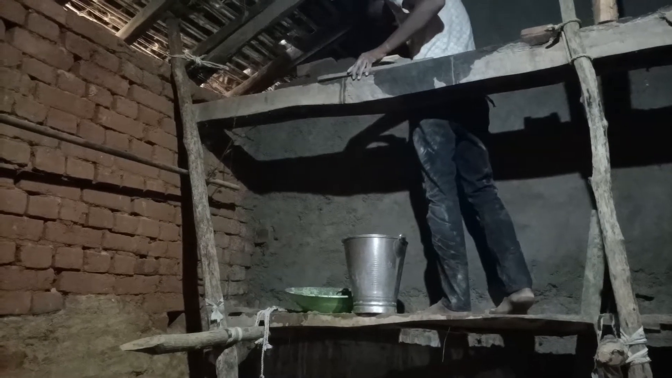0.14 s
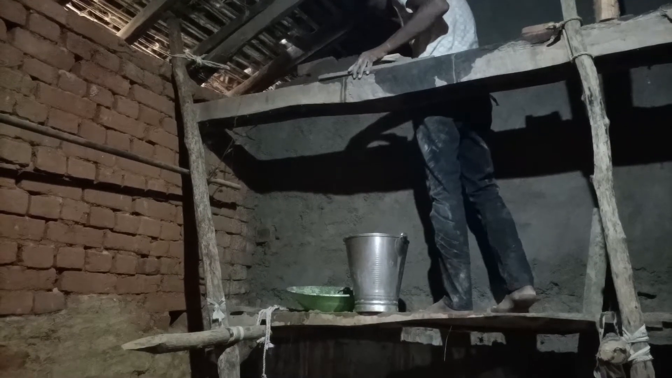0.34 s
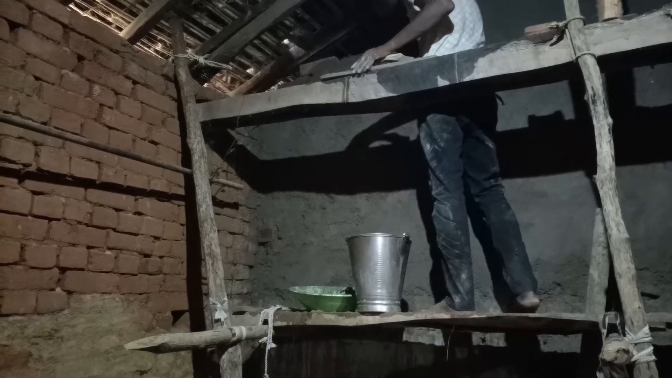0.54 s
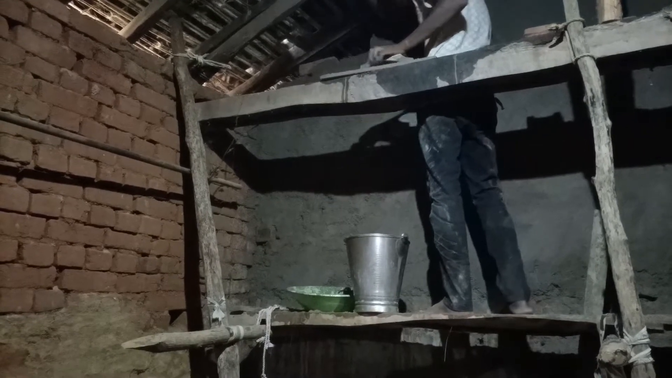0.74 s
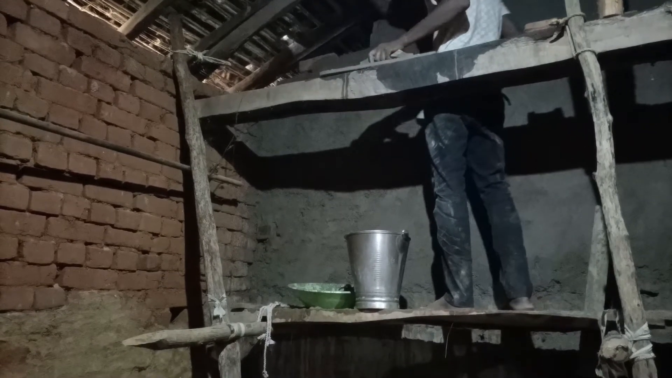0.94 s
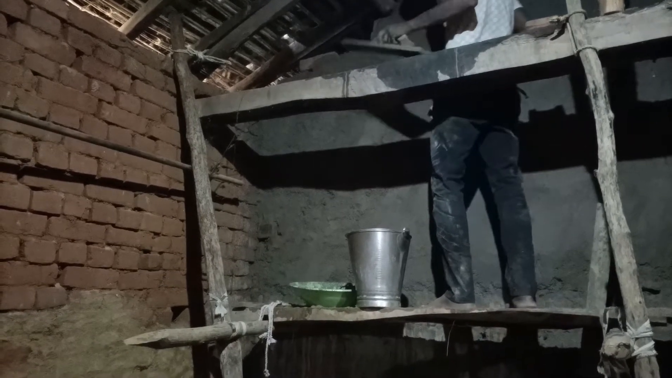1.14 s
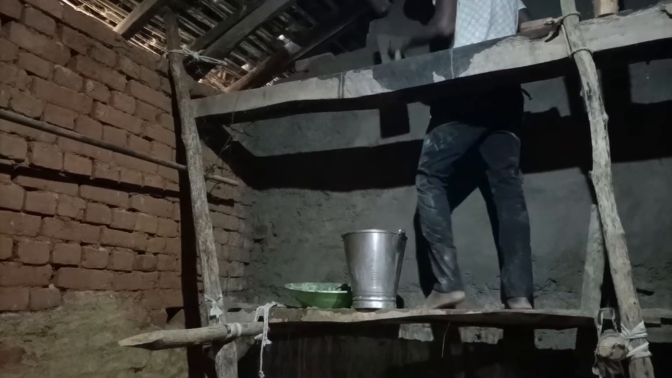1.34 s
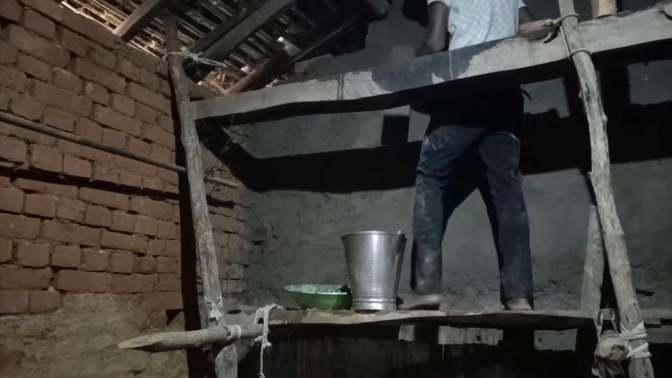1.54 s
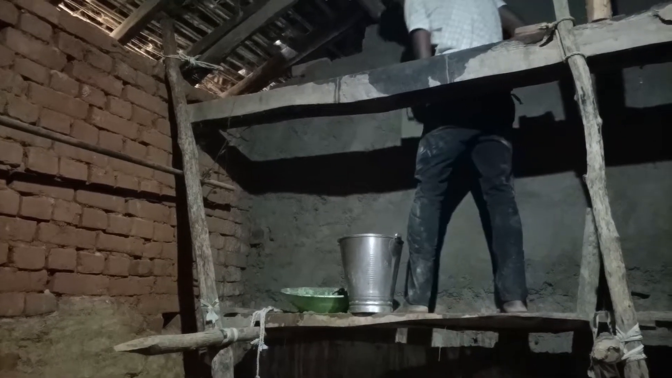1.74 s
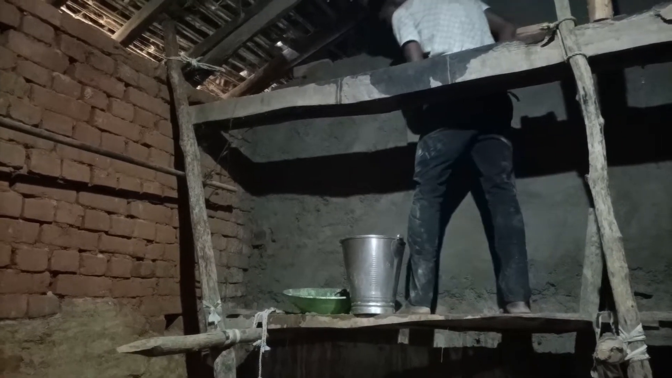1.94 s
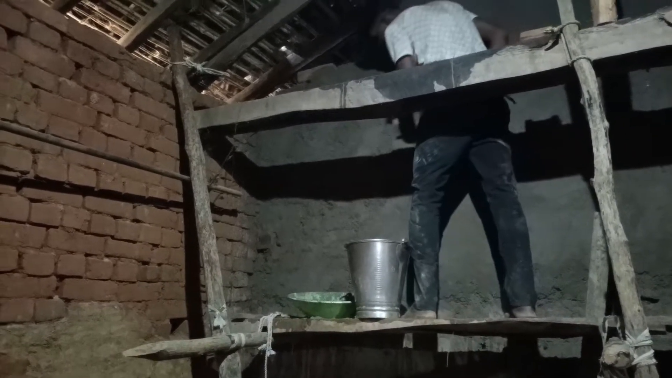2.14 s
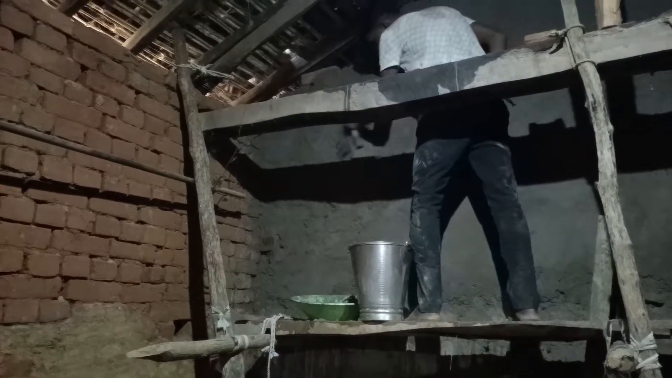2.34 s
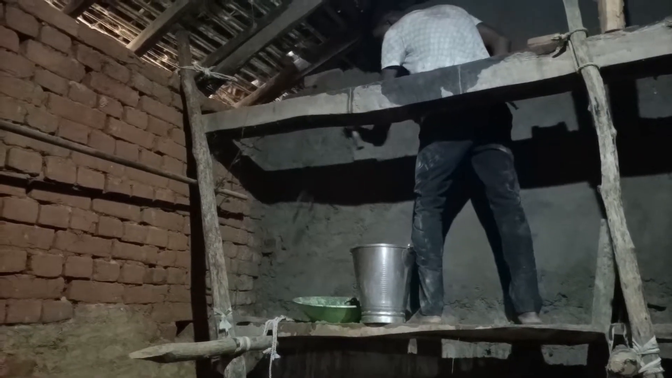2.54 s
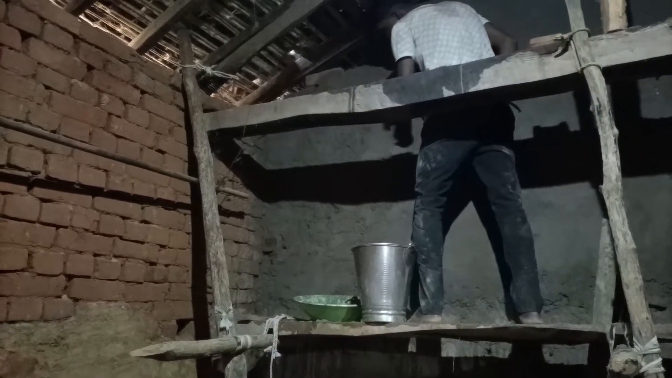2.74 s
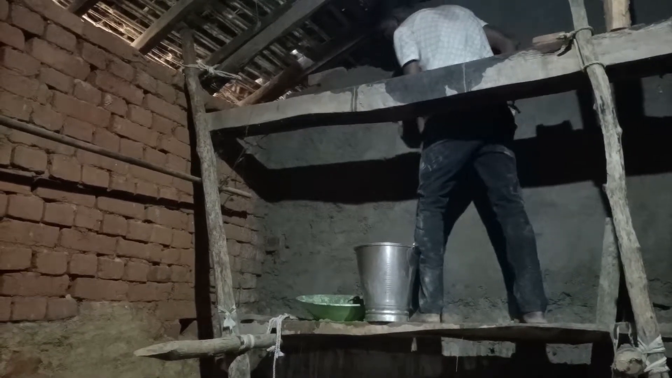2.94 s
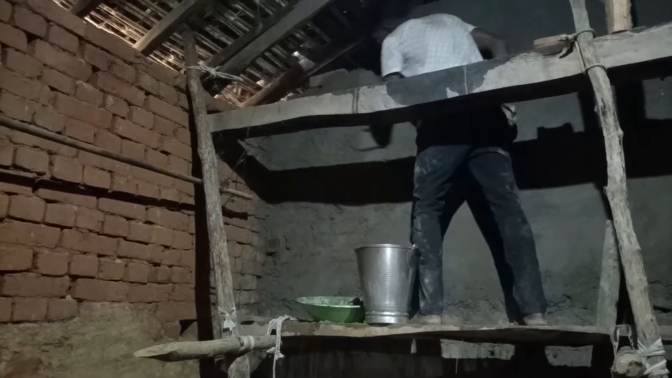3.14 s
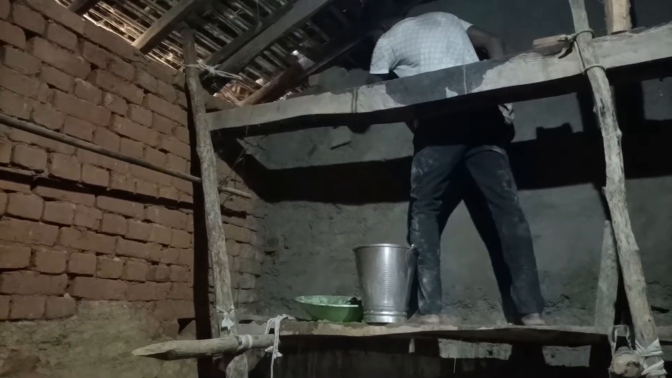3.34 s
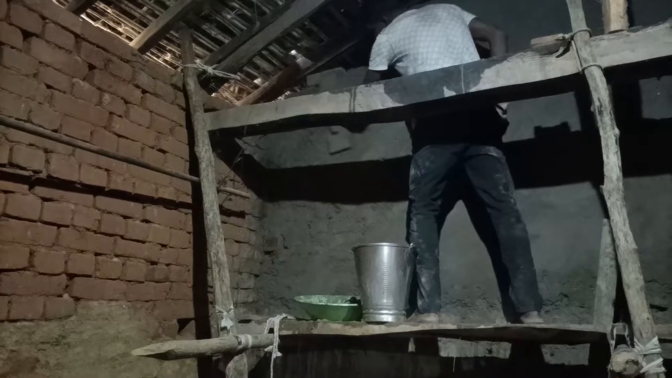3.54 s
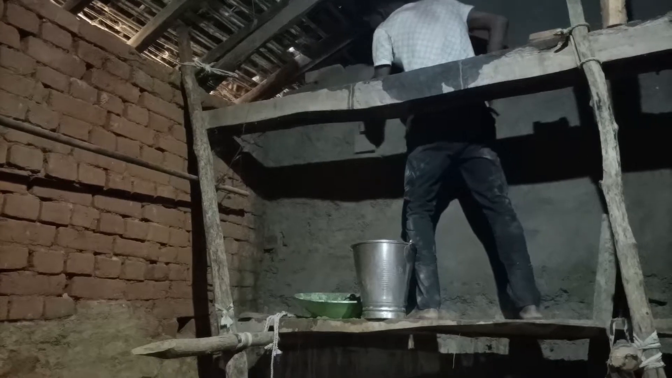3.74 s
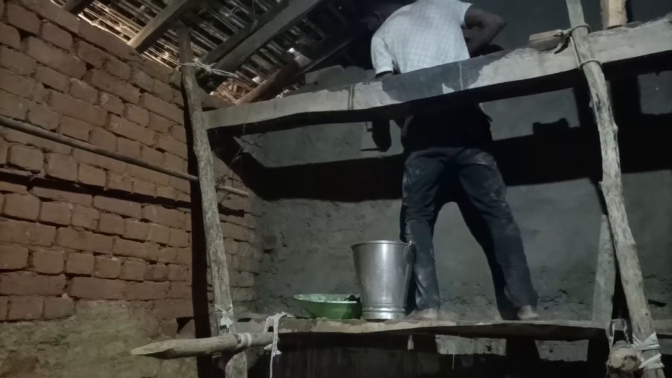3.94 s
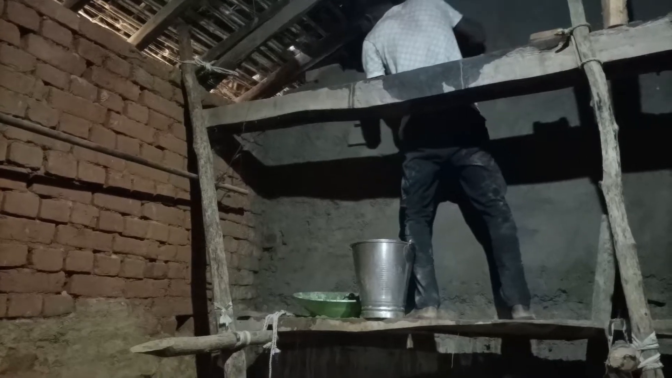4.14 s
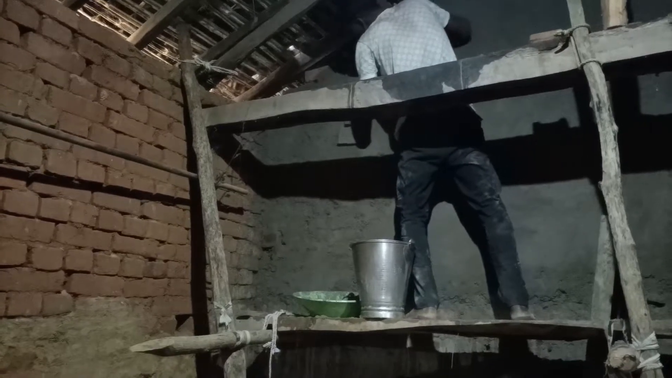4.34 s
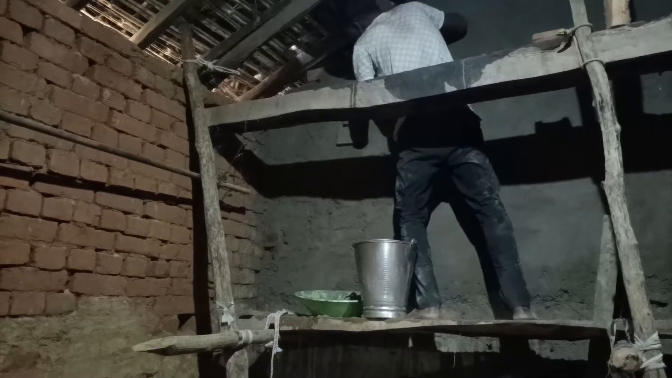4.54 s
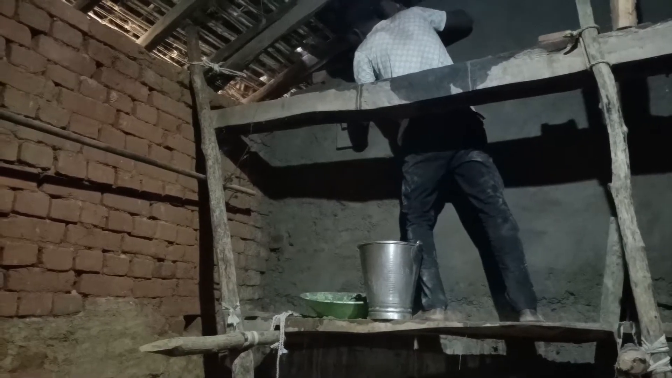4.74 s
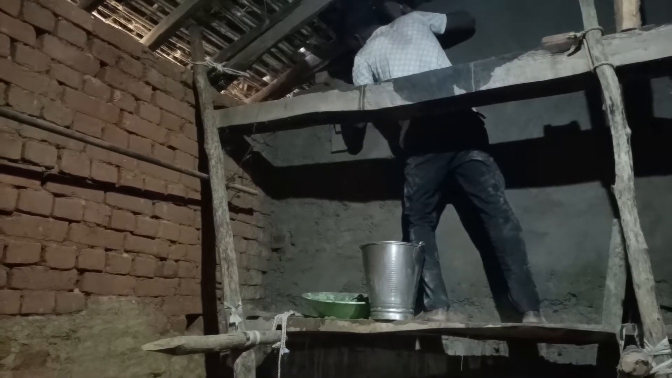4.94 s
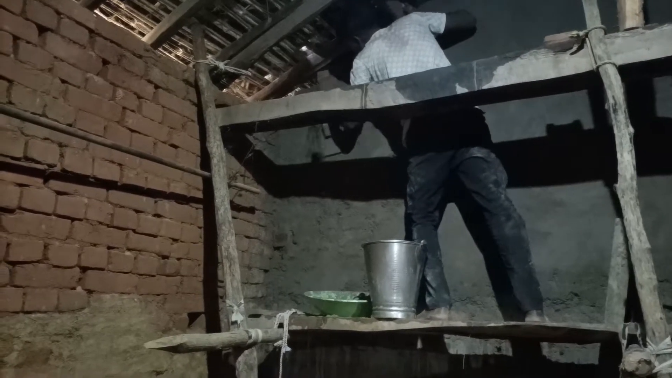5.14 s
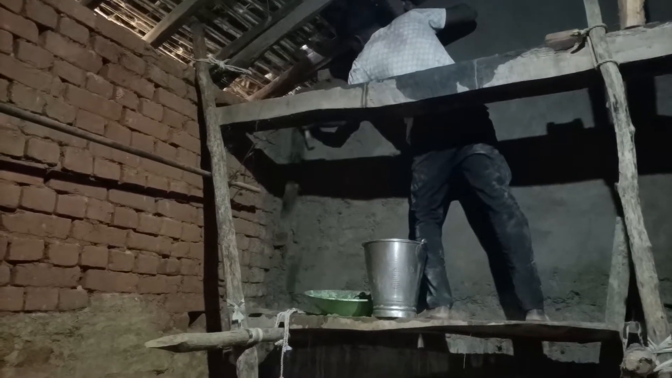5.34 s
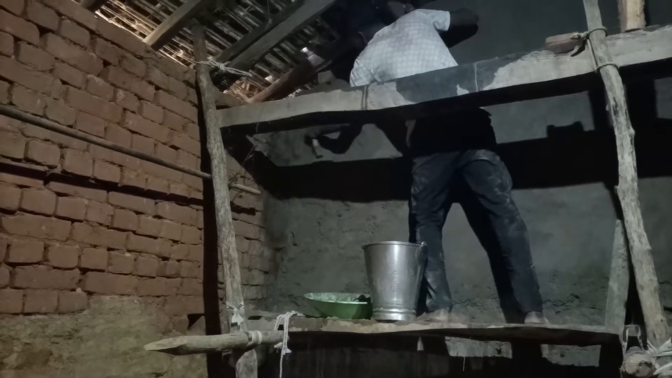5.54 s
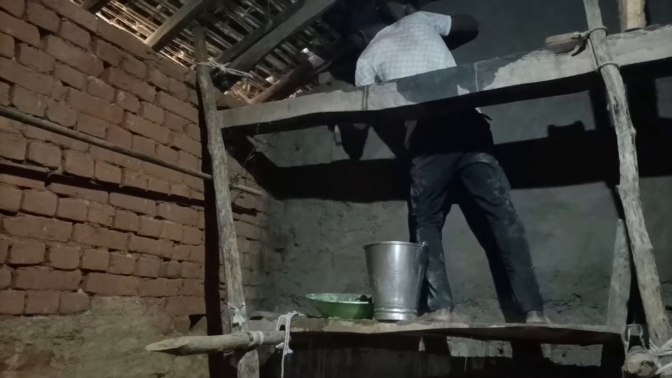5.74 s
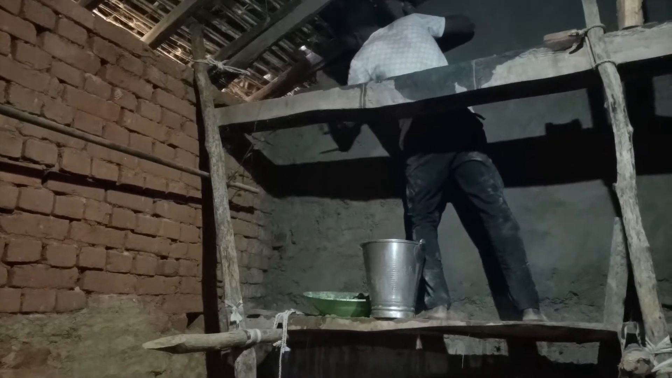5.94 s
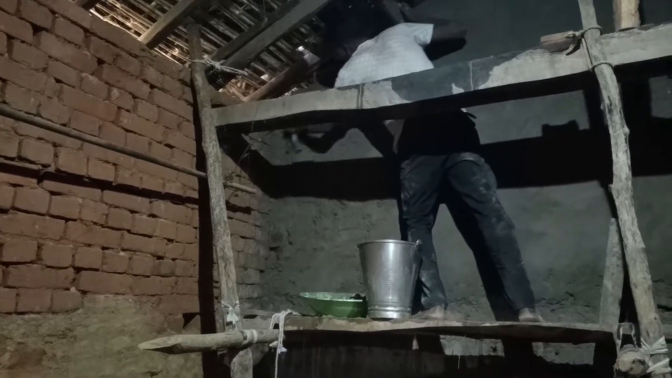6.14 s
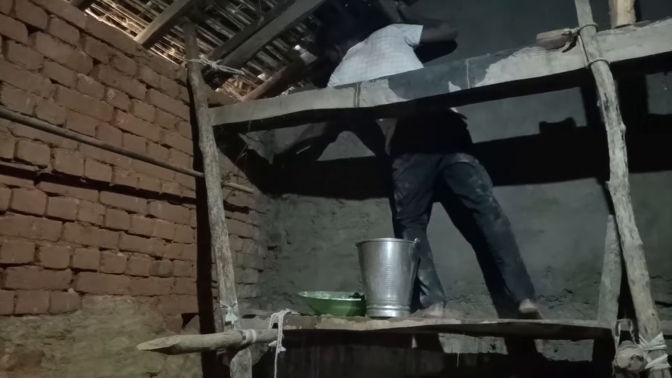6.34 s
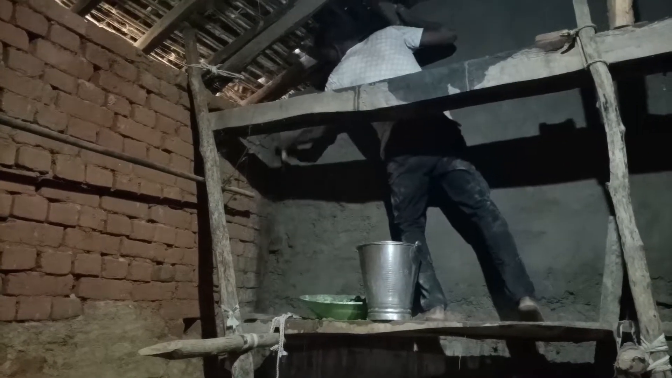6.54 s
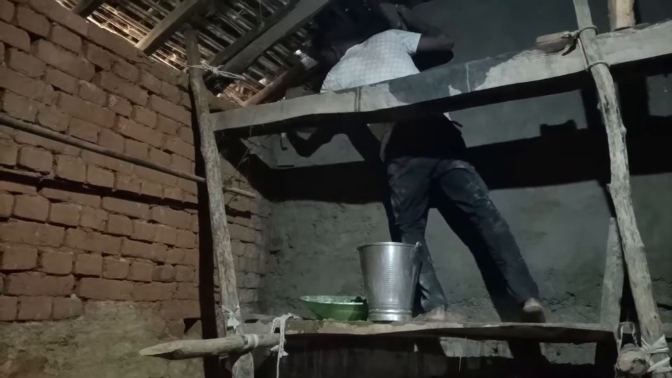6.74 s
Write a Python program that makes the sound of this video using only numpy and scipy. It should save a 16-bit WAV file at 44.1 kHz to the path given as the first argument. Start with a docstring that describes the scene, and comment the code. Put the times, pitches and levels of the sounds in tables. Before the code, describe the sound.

A steel trowel lightly scrapes up gritty mortar with a faint metallic ring, then spreads wet, hissing strokes across a wall, with dull thuds and judders.

```python
"""Plastering a wall by trowel

A plasterer on a plank scaffold in a small brick room scrapes mortar up with a steel trowel, then spreads it on the wall.
Sand is random grain impulses through coloured filters, and wet paste hisses as the same force in a treble band.
Hard pushes make the trowel stick and slip, drumming on modes of the wall; blows and grit ring modes of the blade.
Bumps and plank shudders punctuate the work; a bird chirp and two soft notes come faintly from outside."""
import sys
import numpy as np
from scipy import signal
from scipy.fft import rfft, irfft
from scipy.io import wavfile

SR = 44100
rng = np.random.default_rng(int(sys.argv[2]) if len(sys.argv) > 2 else 0)


def put_to_file(sound):
    """Save the sound as 16-bit audio at rate SR, in the file named by the first command-line argument."""
    columns = np.atleast_2d(sound).T  # one column per channel
    safe = np.clip(columns, -1, 1)
    whole_steps = np.round(safe * 32767)
    wavfile.write(sys.argv[1], SR, whole_steps.astype(np.int16))


N = 299439
TIME, HZ = np.arange(N) / SR, np.fft.rfftfreq(N, 1 / SR)

# Scrapes that gather mortar on the blade. Each row: hardest push, rise and fall in seconds, flexing resonance at the
# start and at the end in Hz, flexing over grinding in dB, then relative levels of grinding and wet hiss in dB.
GATHERING_SCRAPES = [(.11, 0.37, 0.12, 1200, 1490, -8, -39.5, -38.5),
                     (.5, 0.096, 0.032, 1660, 1740, -8, -42.5, -39.5),
                     (.818, 0.035, 0.059, 1700, 1700, -27, -60.5, -55),
                     (1.056, 0.027, 0.031, 1550, 1500, -0.5, -62.5, -62),
                     (1.31, 0.094, .06, 1500, 1450, -22, -67.5, -69),
                     (1.481, 0.043, 0.018, 1350, 1400, -12, -53, -51),
                     (1.664, 0.014, .035, 1620, 1560, 0, -56, -58),
                     (1.76, 0.095, 0.1, 1470, 1350, -6, -69.5, -68)]
# Strokes on the wall. Each row: the same columns, then relative levels of judder and of mortar drag in dB.
WALL_STROKES = [(1.96, 0.12, 0.12, 1460, 1700.0, -1.5, -50.5, -61, -65, -74),
                (2.38, 0.32, 0.18, 1650, 1170, -9.0, -30.5, -39.0, -59, -42.5),
                (2.709, 0.16, 0.2, 1220, 1330.0, -14.5, -33.5, -43.5, -67, -53),
                (2.93, 0.12, 0.16, 1560.0, 1540, -23, -44, -45.5, -63.5, -56),
                (3.2, 0.24, 0.27, 1440, 1580, -12.5, -28, -35.0, -44.5, -37),
                (3.39, 0.14, 0.19, 1900.0, 2200.0, -18, -32.5, -38, -52.5, -43),
                (3.769, 0.22, 0.24, 2340, 2800, -16, -34.5, -39.5, -66, -48.5),
                (4.229, 0.2, 0.28, 2400.0, 2370, -17.0, -30, -34, -38.5, -35.0),
                (4.52, 0.14, 0.55, 2400.0, 2250.0, -16.0, -42, -47.0, -59.5, -53),
                (5.2, 0.48, 0.087, 1170, 1420, -13.5, -38.5, -45.0, -55, -49.5),
                (5.349, 0.19, 0.31, 1340, 1400, -14.5, -35.0, -42.0, -52.5, -44),
                (5.74, 0.16, 0.083, 944, 1650, -9, -33, -37.5, -53, -49),
                (5.99, 0.31, 0.24, 2200.0, 2400.0, -25.0, -35, -36, -46.5, -45),
                (6.251, 0.25, 0.23, 900.0, 1150.0, -17.5, -27.5, -30.5, -31.0, -34.5),
                (6.49, 0.26, 0.23, 2450.0, 2550.0, -20.0, -38, -48.5, -50, -43.5),
                (6.73, 0.16, 0.16, 2430, 2950.0, -7.5, -35.5, -40.5, -53, -50.5)]
# The blade lands or flicks off. Each row: start in seconds, relative levels of crunch and paste splash in dB,
# T60 in seconds.
BLADE_TOUCHES = [(.303, -50, -37, 0.017), (.402, -47, -42, 0.18), (.622, -64, -55, 0.04),
                 (1.653, -47, -56.5, 0.072), (1.854, -44, -54, 0.13), (1.931, -39.5, -52, 0.15),
                 (2.945, -49, -32.5, .2), (3.011, -31, -29.5, .08), (3.058, -29.5, -28, 0.13),
                 (3.785, -39, -30.5, 0.16), (4.068, -35, -52, 0.064), (4.542, -29.5, -55, 0.076),
                 (4.574, -35.5, -48, 0.11), (4.626, -39, -58, .1), (4.928, -58, -39, .1),
                 (5.52, -48, -33.5, 0.16), (5.698, -31.5, -24, 0.12), (5.803, -33, -24, .14),
                 (5.9, -34, -24, 0.13), (6.082, -32, -26, 0.28), (6.533, -33, -46, .06),
                 (6.555, -28.5, -27.5, 0.094)]
# Modes of the free steel blade. Each row: frequency in Hz, relative level in dB, T60 in seconds.
BLADE_MODES = [(469, -13.5, 0.55), (683, -11, 0.81), (837, -10, 0.5), (1037, -25, 0.65), (1570, -9, 0.27),
               (1654, -4.5, 0.55), (2590, -1.5, 0.54), (3300, -8, 0.27), (3850, -18, .2), (4550, -8, 0.2),
               (5180, -5, 0.25)]
# Low modes of the wall that the trowel drums on. Each row: frequency in Hz, relative level in dB, T60 in seconds.
WALL_MODES = [(184, -6, 0.19), (236, 1.5, 0.087), (298.4, 3.5, 0.089), (343, -12, 0.078), (489.4, -11, 0.2)]
# Modes of the trowel body in thick mortar. Each row: frequency in Hz, relative level in dB, T60 in seconds.
DRAGGED_MODES = [(386, -3.5, 0.057), (452.4, 0, 0.088), (505, 1, 0.061), (656.5, -7.5, 0.28),
                 (773, 3.5, 0.054), (950, -5, 0.093)]
# Spectrum of sand ground under the blade. Each row: frequency in Hz, relative density in dB per Hz.
SAND_SPECTRUM = [(300, -42.5), (900, -8.5), (1180, -1.5), (1400, -2.5), (1650, -2), (2000, -0.5), (2600, 2),
                 (2950, 0.5), (3400, 0), (4000, -1), (5200, -3.5), (6200, -3), (7400, -17.5), (10000, -36)]
# Spectrum of hissing wet paste. Each row: frequency in Hz, relative density in dB per Hz.
PASTE_SPECTRUM = [(3000, -42), (6000, -3), (7800, -4), (9000, -0.5), (10200, 2), (12500, 0), (14000, 3),
                  (15500, 1)]
# Spectrum of thick, packed mortar. Each row: frequency in Hz, relative density in dB per Hz.
MORTAR_SPECTRUM = [(150, -16), (380, -7.5), (495, -4), (575, -1), (665, 2.5), (780, -1.5), (950, 0.5),
                   (1300, -10), (2500, -38)]


def amp(db):
    """Level to amplitude: 20 dB is a factor of ten."""
    return 10 ** (np.asarray(db) / 20)


def unit(x):
    """Normalization of a signal to rms 1."""
    return x / np.sqrt(np.mean(x ** 2) + 1e-20)


def read(points, hz):
    """Linear interpolation of a tabulated curve on a log-frequency axis."""
    f, value = np.transpose(points)
    return np.interp(np.log(hz + 1), np.log(f + 1), value)


def push(t, s, rise_s, fall_s):
    """Force envelope of one stroke: the arm's push is a rounded arch from 0 to 1 that tops at s."""
    ease_db = -18.5  # level at the ends of rise and fall
    arch = 2.49  # a higher power flattens the top
    away = np.maximum((s - t) / rise_s, (t - s) / fall_s)
    return amp(ease_db * np.minimum(away, 2) ** arch)


def gains(rows):
    """Power-law response to force: each layer grows as a power of the push, and overlapping strokes add in power."""
    # Exponents of the push, without unit, in order for grinding, wet hiss, judder and drag.
    push_powers = [1.064, 1.15, 1.84, 1.52]
    t, rows = TIME[::64], np.array(rows)
    pushes = np.array([push(t, *row[:3]) for row in rows])
    curves = []
    for levels_db, power in zip(rows.T[6:], push_powers):
        stroke_gains = amp(levels_db)[:, None] * pushes ** power
        curves.append(np.interp(TIME, t, np.linalg.norm(stroke_gains, axis=0)))
    return curves


def bursts(times, levels_db, t60s):
    """Exponential decay: contacts start suddenly and die away, each kept for at most half a second."""
    out = np.zeros(N)
    for s, db, t60 in zip(times, levels_db, t60s):
        part = out[round(s * SR):][:SR // 2]
        part += amp(db - 60 * TIME[:len(part)] / t60)
    return out


def colour(x, spectrum, size=4096):
    """Minimum-phase filtering: a causal filter of unit power shapes the spectrum."""
    hz = abs(np.fft.fftfreq(size, 1 / SR))
    low_skirt = 1 + (spectrum[0][0] / (hz + 1) / 2) ** 4
    high_skirt = 1 + (hz / spectrum[-1][0] / 2) ** 4
    magnitude = amp(read(spectrum, hz)) / np.sqrt(low_skirt * high_skirt)
    # the Hilbert transform of the log magnitude gives the minimum phase
    response = np.exp(np.conj(signal.hilbert(np.log(magnitude))))
    taps = np.fft.ifft(response).real
    return signal.oaconvolve(x, taps / np.linalg.norm(taps))[:N]


def ringing(modes):
    """Modal superposition: decaying cosines form an impulse response of energy 1."""
    t = TIME[:SR]
    ring = sum(amp(db - 60 * t / t60) * np.cos(2 * np.pi * hz * t) for hz, db, t60 in modes)
    return ring / np.linalg.norm(ring)


def through(x, modes):
    """Forced vibration: a force drives the modes of a body, which radiates little outside their range."""
    edges_hz = [modes[0][0] * .8, modes[-1][0] * 1.5]
    band = signal.butter(3, edges_hz, "bandpass", fs=SR, output="sos")
    return signal.sosfilt(band, signal.oaconvolve(x, ringing(modes))[:N])


def wobble(rate_hz):
    """Random modulation: noise above rate_hz is weakened, leaving a slow fluctuation of rms 1."""
    spectrum = rfft(rng.standard_normal(N)) / (1 + (HZ / rate_hz) ** 2)
    return unit(irfft(spectrum, N))


def grit(per_s, smooth):
    """Shot noise: sand grains crushed at random over a share of smooth rubbing, with expected power 1."""
    chance, smooth = np.clip(per_s / SR, 1e-4, 1), np.clip(smooth, 0, 1)
    crushed = rng.random(N) < chance
    grains = crushed * rng.standard_normal(N) / np.sqrt(chance)
    return np.sqrt(1 - smooth) * grains + np.sqrt(smooth) * rng.standard_normal(N)


def resonate(x, hz, width_hz):
    """Heterodyne resonance: a steep two-pole filter follows the curve hz, and the result has rms 1."""
    turn = np.exp(2j * np.pi * np.cumsum(hz) / SR)
    r = np.exp(-np.pi * width_hz / SR)
    # shift the resonance to zero frequency, low-pass, then shift back
    centred = signal.lfilter([1], [1, -2 * r, r * r], x / turn)
    return unit((turn * centred).real)


def air(mid_db=-64.5):
    """Background noise: independent coloured noises give quiet outdoor rumble and hiss under the open roof."""
    # Spectrum of quiet air. Each row: frequency in Hz, relative density in dB per Hz.
    air_spectrum = [(25, 4), (60, -3), (150, -12), (300, -17.5), (600, -21), (1000, -26.5), (2500, -26),
                    (6000, -29.5), (15500, -31.5)]
    sides = np.array([colour(rng.standard_normal(N), air_spectrum) for _ in range(2)])
    return amp(mid_db) * sides * np.sqrt(2)  # independent sides lose half their power in the mid


def gathering(grind_trim_db=-1, hiss_trim_db=-1, uneven_db=-0.35):
    """Friction noise of the free blade: light scrapes are thin and metallic."""
    # Spectrum of a light scrape. Each row: frequency in Hz, relative density in dB per Hz.
    thin_spectrum = [(150, -28), (350, -13), (600, -14.5), (1000, -16.5), (1280, -8), (1500, -11),
                     (1750, -0.5), (2050, -7), (2400, 3), (3200, -0.5), (4700, 1), (6300, 0.5),
                     (7400, -8.5), (10000, -25)]
    grind, hiss = gains(GATHERING_SCRAPES)
    force = grit(3000, 0.64) * amp(uneven_db * wobble(60))
    scrape = colour(force * grind, thin_spectrum)
    paste = colour(force * hiss, PASTE_SPECTRUM)
    return amp(grind_trim_db) * scrape + amp(hiss_trim_db) * paste


def bending(width_hz=380, waver=0.038):
    """Gliding resonance: grit drives the flexed blade, whose pitch glides once a stroke as the blade tilts."""
    force, drift, out = grit(2000, 0.61), 1 + waver * wobble(28), np.zeros(N)
    for s, rise_s, fall_s, start_hz, end_hz, flex_db, grind_db, *_ in GATHERING_SCRAPES + WALL_STROKES:
        on = (TIME > s - 2 * rise_s) & (TIME < s + 2 * fall_s)
        glide = np.interp(TIME[on], [s - rise_s, s + fall_s], [start_hz, end_hz])
        flexing = resonate(force[on], glide * drift[on], width_hz)
        out[on] += amp(grind_db + flex_db) * push(TIME[on], s, rise_s, fall_s) * flexing
    return out


def singing(free_trim_db=-19, edge_trim_db=-7, bedded_trim_db=-7.5, dragged_trim_db=-5, damping_db=-54, grip_db=3):
    """Friction-driven modes: grit keeps the steel ringing; pressing damps it and leaves the low body tones."""
    # Blade stiffened by its edge on the mortar board. Each row: frequency in Hz, relative level in dB, T60 in seconds.
    edge_modes = [(1230, -8, 0.047), (1410, -7, 0.056), (1766, 6, 0.09), (2270, 3, 0.043),
                  (2600, -14, 0.042), (3290, -8, 0.055), (4700, -6, .05), (6040, 1, .04)]
    # Blade bedded in mortar and damped. Each row: frequency in Hz, relative level in dB, T60 in seconds.
    bedded_modes = [(493, -27, 0.09), (664.6, -1.5, 0.095), (1213, 3.5, 0.02), (1654, -0.5, 0.13),
                    (2574, 10, 0.041), (3410, 11, 0.033), (6060, 6, 0.016)]
    grind, _, pressed, drag = gains(WALL_STROKES)
    light = grit(1400, 0.5) * gains(GATHERING_SCRAPES)[0]
    free = amp(free_trim_db) * through(light, BLADE_MODES)
    edge = amp(edge_trim_db) * through(light, edge_modes)
    grip = amp(grip_db * wobble(2.8))
    damping = 1 + pressed / amp(damping_db)  # halves the drive when the judder gain reaches damping_db
    bedded = through(grit(1500, 0.64) * grind * grip / damping, bedded_modes)
    dragged = through(grit(600, 0.23) * drag, DRAGGED_MODES)
    return free + edge + amp(bedded_trim_db) * bedded + amp(dragged_trim_db) * dragged


def bumps(thud_trim_db=26, knock_t60=0.09, mortar_trim_db=-4, trowel_trim_db=-1):
    """Impact excitation: the trowel catches, a blow thuds on the wall and packed mortar knocks briefly."""
    # Bumps of the trowel. Each row: start in seconds, relative levels of thud and of higher knock in dB.
    bump_rows = [(.112, -53, -47), (.306, -57.5, -71), (.408, -59.5, -65), (1.474, -56, -59),
                 (1.94, -57, -57), (3.059, -40, -31), (3.784, -48, -37), (4.205, -48, -35.5),
                 (4.288, -30.5, -48), (4.572, -63.5, -42), (4.628, -66, -37.5), (5.696, -29, -46),
                 (5.803, -33, -44), (5.815, -27.5, -46), (5.923, -36.5, -35.5), (6.027, -37.5, -39),
                 (6.082, -27, -35), (6.122, -29.5, -34.5), (6.262, -25, -43), (6.558, -35.5, -44),
                 (6.618, -35.5, -54)]
    s, thuds_db, knocks_db = np.transpose(bump_rows)
    blows = np.zeros(N)
    blows[np.round(s * SR).astype(int)] = amp(thuds_db + thud_trim_db)
    knocks = grit(2000, 0.86) * bursts(s, knocks_db, np.full(len(s), knock_t60))
    mortar = amp(mortar_trim_db) * colour(knocks, MORTAR_SPECTRUM)
    trowel = amp(trowel_trim_db) * through(knocks, DRAGGED_MODES)
    return through(blows, WALL_MODES) + mortar + trowel


def touches():
    """Transient friction: the blade crunches into the mortar and squirts paste, both dying away together."""
    s, crunch_db, splash_db, t60 = np.transpose(BLADE_TOUCHES)
    force = grit(4000, 0.52)
    crunch = colour(force * bursts(s, crunch_db, t60), SAND_SPECTRUM)
    splash = colour(force * bursts(s, splash_db, t60), PASTE_SPECTRUM)
    return crunch + splash


def rings(ring_over_crunch_db=6, lift_s=.519, lift_db=-18.5):
    """Free vibration: steel rings faintly at each touch, and clearly as the loaded blade slips off the mortar."""
    s, crunch_db, _, _ = np.transpose(BLADE_TOUCHES)
    blows = np.zeros(N)
    blows[np.round(s * SR).astype(int)] = amp(crunch_db + ring_over_crunch_db)
    blows[round(lift_s * SR)] = amp(lift_db)
    return through(blows, BLADE_MODES)


def far_notes(note_hz=1035, spread_s=.04, level_db=-73):
    """Pure tones with Gaussian envelopes: two faint notes from outside, perhaps another bird."""
    # Centres of the notes in seconds.
    note_times = [1.08, 1.32]
    swell = sum(np.exp(-((TIME - s) / spread_s) ** 2 / 2) for s in note_times)
    return amp(level_db) * swell * np.sin(2 * np.pi * note_hz * TIME)


def bird(start_s=1.383, length_s=.075, base_hz=4650, arch_hz=300, level_db=-71):
    """Frequency modulation: the pitch of one far chirp rises and falls in an arch."""
    arch = np.sin(np.pi * np.clip((TIME - start_s) / length_s, 0, 1))
    phase = 2 * np.pi * np.cumsum(base_hz + arch_hz * arch) / SR
    return amp(level_db) * np.sqrt(abs(arch)) * np.sin(phase)


def scuff(s=1.462, spread_s=0.023, level_db=-58.0):
    """Friction through low modes: a soft, dull scuff as the worker turns to the wall."""
    swell = np.exp(-((TIME - s) / spread_s) ** 2 / 2)
    return amp(level_db) * through(grit(1400, 0.29), DRAGGED_MODES) * swell


def spreading(grind_trim_db=-2.65, hiss_trim_db=1.5, drag_trim_db=-5, uneven_db=-0.26, patchy_db=1):
    """Granular friction: the harder the blade grinds in a long stroke, the more grains break under it."""
    grind, hiss, _, drag = gains(WALL_STROKES)
    grains_per_s = 150 + 3000 * (grind / grind.max()) ** 2
    force = grit(grains_per_s, 0.62) * amp(uneven_db * wobble(41))
    sand = colour(force * grind * amp(patchy_db * wobble(31)), SAND_SPECTRUM)
    paste = colour(force * hiss * amp(patchy_db * wobble(27)), PASTE_SPECTRUM)
    mortar = colour(force * drag, MORTAR_SPECTRUM)
    return amp(grind_trim_db) * sand + amp(hiss_trim_db) * paste + amp(drag_trim_db) * mortar


def judder(median_slips_hz=130, irregular=.5, size_db=3, trim_db=-3):
    """Stick-slip: the trowel catches and frees itself unevenly, drumming on the wall."""
    turns = np.cumsum(median_slips_hz * np.exp(irregular * wobble(100.2))) / SR
    # one impulse at each whole turn, of random size
    slips = np.diff(np.floor(turns), prepend=0) * amp(size_db * wobble(180))
    force = unit(unit(slips - slips.mean()) + 0.71 * grit(800, 0.3))
    return amp(trim_db) * through(force * gains(WALL_STROKES)[2], WALL_MODES)


def scaffold():
    """Low modal vibration: the planks shudder as weight shifts."""
    # Modes of the planks. Each row: frequency in Hz, relative level in dB, T60 in seconds.
    plank_modes = [(62, -2, 0.16), (78, -3.5, 0.094), (124, -5, 0.11), (164, -14, 0.17)]
    # Shifts of weight. Each row: start in seconds, relative level in dB, T60 in seconds.
    weight_shifts = [(1.95, -47, 0.31), (3.069, -45, 0.33), (4.2, -51, .35), (5.534, -42.5, .38),
                     (5.61, -49, 0.48), (5.7, -43, 0.28), (5.81, -45, 0.48), (6.09, -46, 0.37),
                     (6.235, -44, 0.29), (6.557, -39, 0.13)]
    return unit(through(grit(300, 0.31), plank_modes)) * bursts(*np.transpose(weight_shifts))


def direct(x, turn_hz=1300):
    """Phase difference between ports: opposite turns nearing 45 degrees put the direct treble out of step."""
    turn = np.exp(1j * np.pi / 4 * HZ ** 2 / (HZ ** 2 + turn_hz ** 2))
    return irfft(rfft(x) * np.array([turn, turn.conj()]), N)


def room(x, wet_db=6, early=0.55, early_s=0.0022, count=10, size=8192, changes_per_s=60):
    """Reverberation: brick walls give a short, dense tail whose echo pattern changes as the trowel moves."""
    # Reverberation of the room. Each row: frequency in Hz, T60 in seconds.
    room_decay = [(150, 0.53), (700, 0.15), (2000, 0.19), (6000, 0.19), (15000, 0.18)]
    t, shape = TIME[:size], (count, 2, size)
    echoes = rng.choice([-1., 1.], shape) * (rng.random(shape) < 4000 / SR)  # about 4000 per second
    hz, s, z = signal.stft(echoes, SR, nperseg=256)
    decay = amp(-60 * s / read(room_decay, hz)[:, None])
    tails = signal.istft(z * decay, SR, nperseg=256)[1][..., :size]
    tails *= 1 + early * np.exp(-t / early_s)  # the worked wall and the roof answer first
    tails *= amp(wet_db) / np.linalg.norm(tails, axis=2, keepdims=True)
    place = TIME * changes_per_s
    out = direct(x)
    for k, tail in enumerate(tails):
        # each tail fades in over one place and out over the next, at constant power
        share = np.sin(np.pi / 2 * np.minimum((place - k) % count, 2))
        out += signal.oaconvolve((x * share)[None], tail, axes=1)[:, :N]
    return out / np.sqrt((1 + amp(wet_db) ** 2) / 2)


def scene(body_echo_db=-11, body_db=-1, bend_trim_db=-1):
    """Superposition: scrapes arrive mostly by the walls, thuds and rings mostly straight, over quiet air."""
    scrapes = gathering() + spreading() + touches() + scuff()
    bodies = judder() + bumps() + scaffold() + rings() + singing()
    bodies += amp(bend_trim_db) * bending() + bird() + far_notes()
    return room(scrapes + amp(body_echo_db) * bodies) + amp(body_db) * direct(bodies) + air()


def record(dry, edge_hz=15700):
    """Two-port reception: close ports share the bass and colour the treble differently, under a band limit."""
    # Stereo width. Each row: frequency in Hz, gain of the side signal in dB.
    side_gain = [(60, -5.5), (250, -6), (550, -0.5), (1100, 1.5), (2500, -1), (4000, 0)]
    # Response of the two ports. Each row: frequency in Hz, left over right in dB.
    port_lean = [(300, -0.6), (2500, .5), (4200, 4), (5000, 3), (6300, 11), (7200, 4), (8100, -9.5),
                 (9500, -1), (12000, -0.5), (14000, 16), (15500, 15)]
    left, right = rfft(dry)
    mid = (left + right) / 2
    side = (left - right) / 2 * amp(read(side_gain, HZ))
    lean = amp(read(port_lean, HZ))
    balance = np.sqrt(2 / (1 + lean ** 2))  # the squared gains of the ports sum to 2
    ports = irfft(np.array([(mid + side) * lean, mid - side]) * balance, N)
    low_pass = signal.firwin(701, edge_hz, window=("kaiser", 9), fs=SR)
    return signal.oaconvolve(ports, low_pass[None], "same")


dry = scene()
out = record(dry)
put_to_file(out)
```